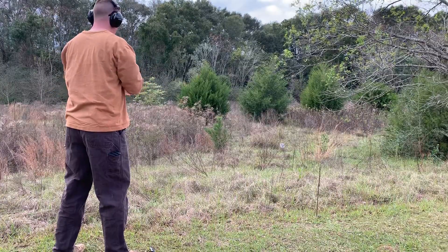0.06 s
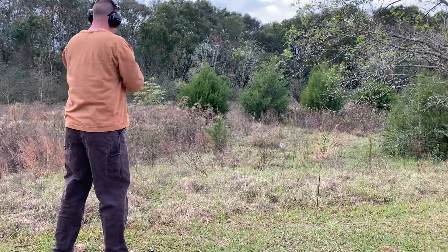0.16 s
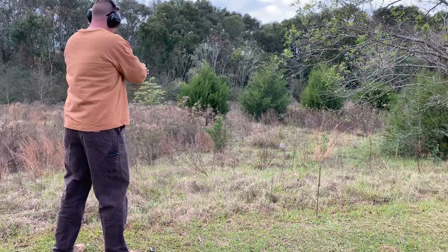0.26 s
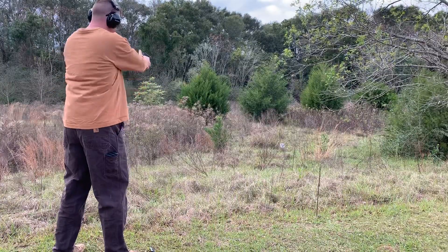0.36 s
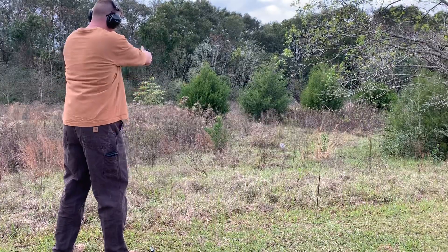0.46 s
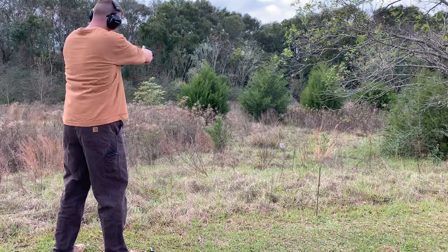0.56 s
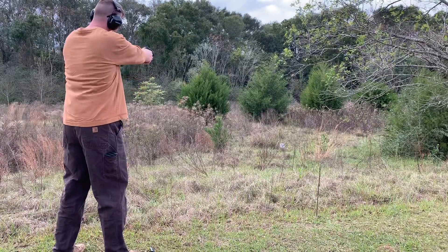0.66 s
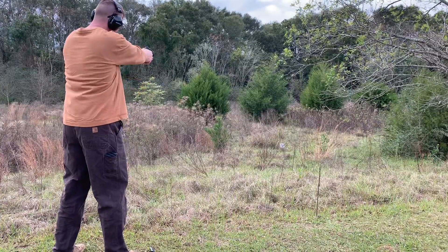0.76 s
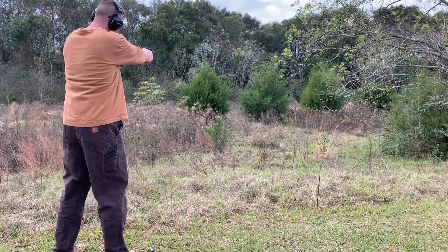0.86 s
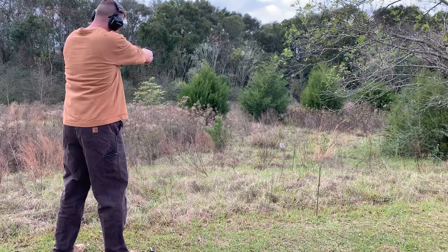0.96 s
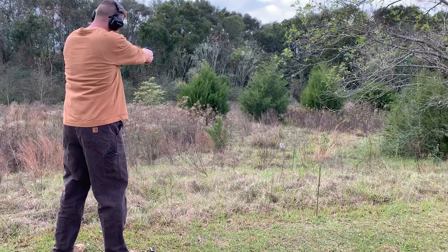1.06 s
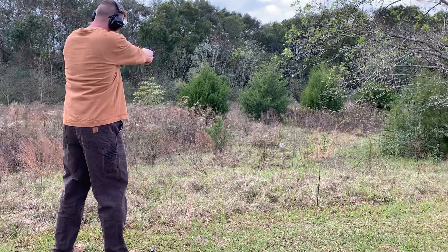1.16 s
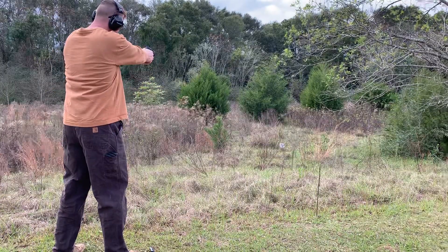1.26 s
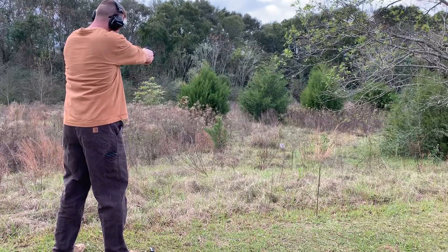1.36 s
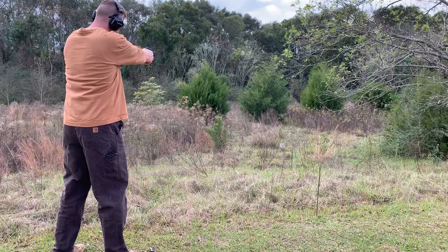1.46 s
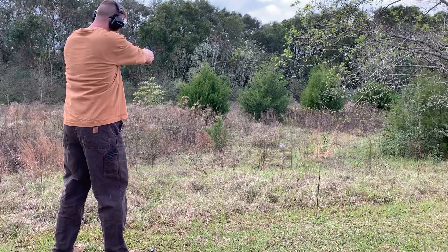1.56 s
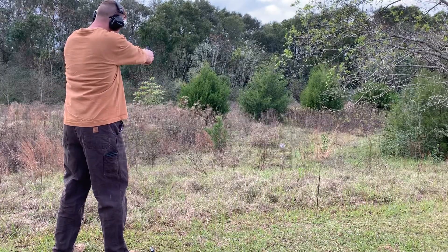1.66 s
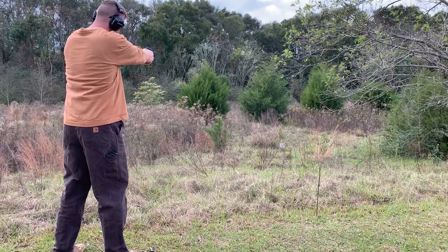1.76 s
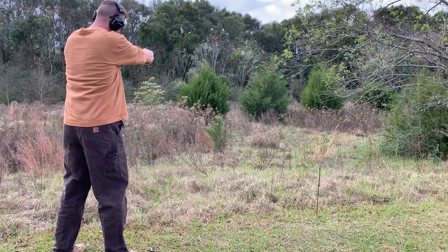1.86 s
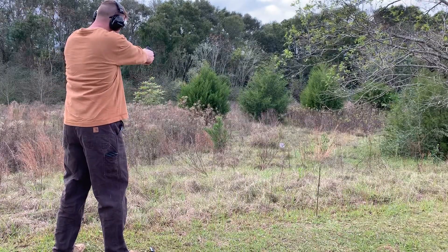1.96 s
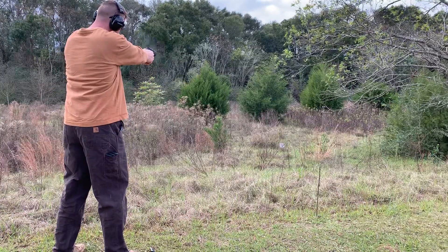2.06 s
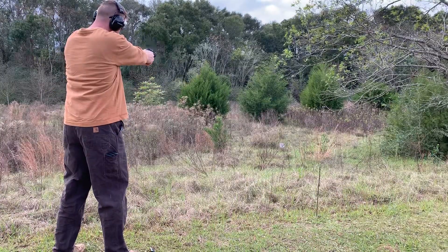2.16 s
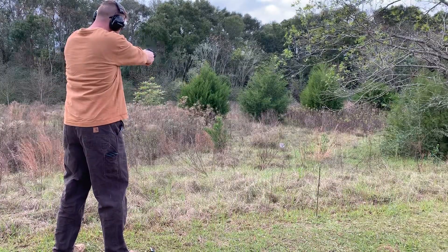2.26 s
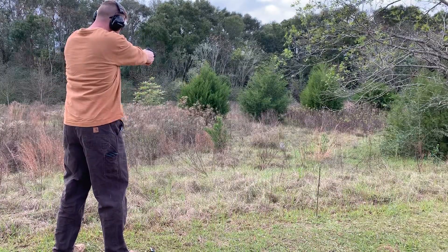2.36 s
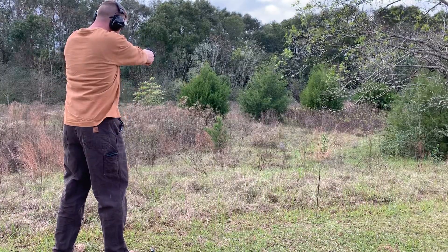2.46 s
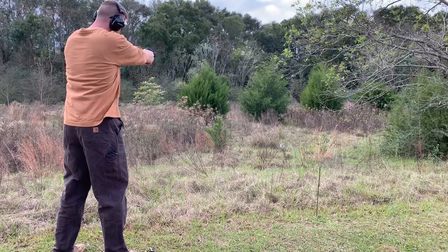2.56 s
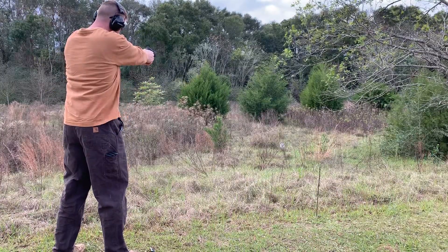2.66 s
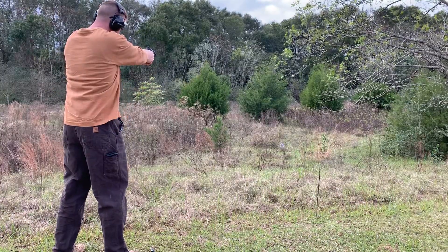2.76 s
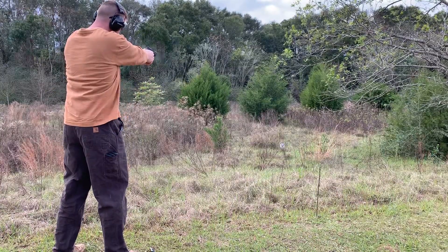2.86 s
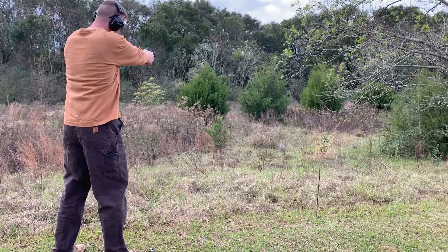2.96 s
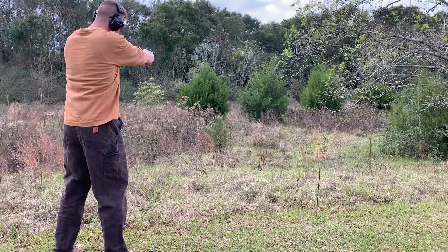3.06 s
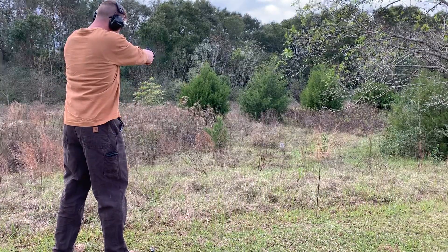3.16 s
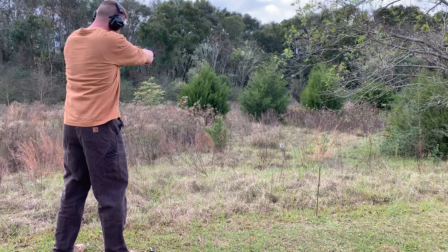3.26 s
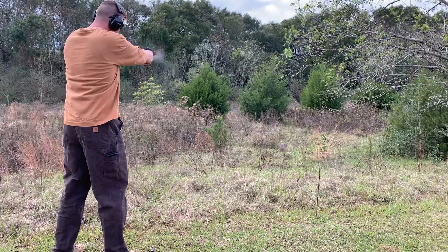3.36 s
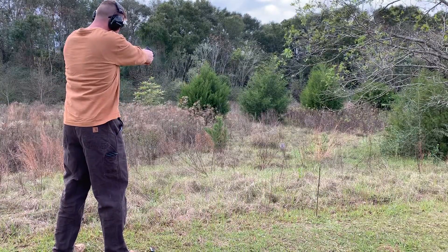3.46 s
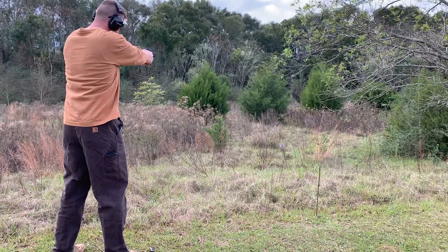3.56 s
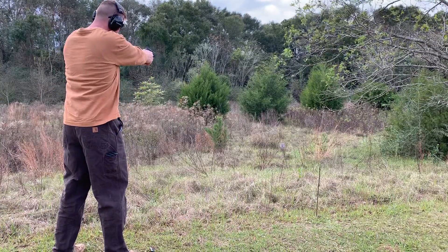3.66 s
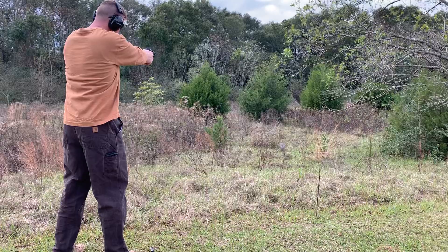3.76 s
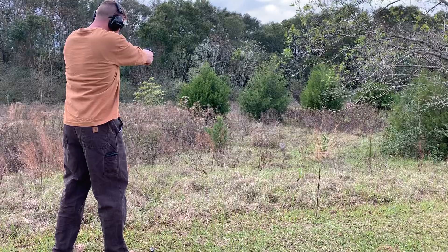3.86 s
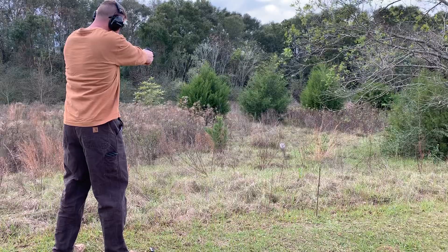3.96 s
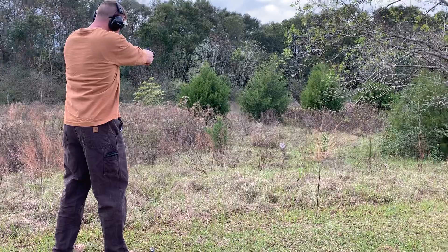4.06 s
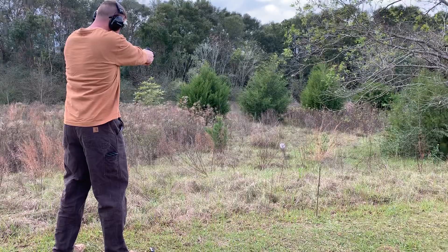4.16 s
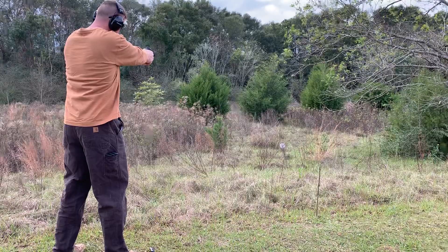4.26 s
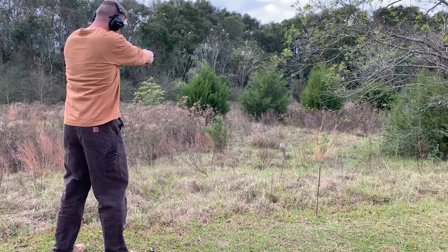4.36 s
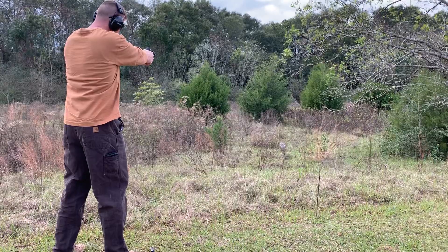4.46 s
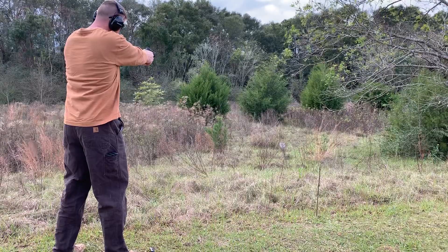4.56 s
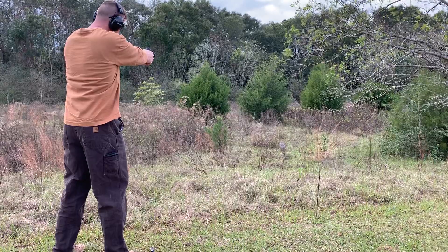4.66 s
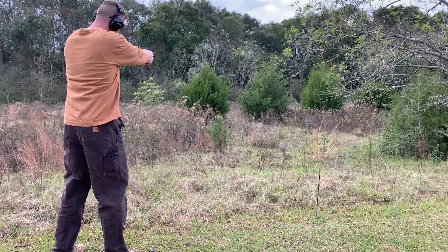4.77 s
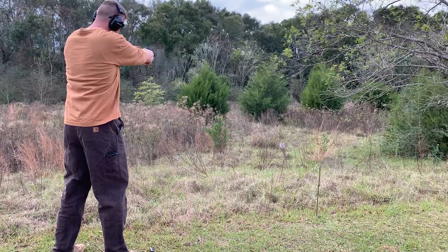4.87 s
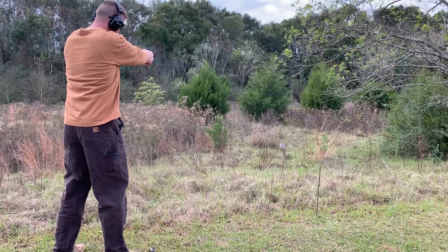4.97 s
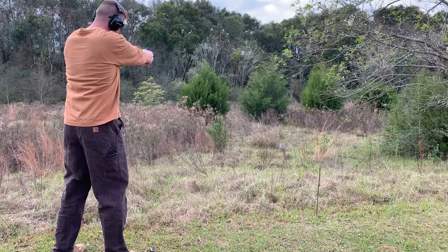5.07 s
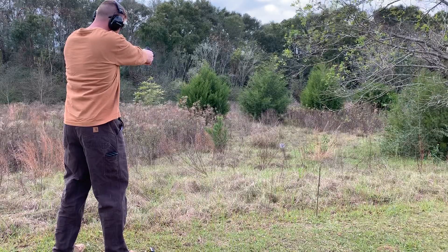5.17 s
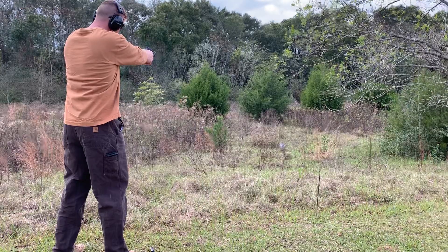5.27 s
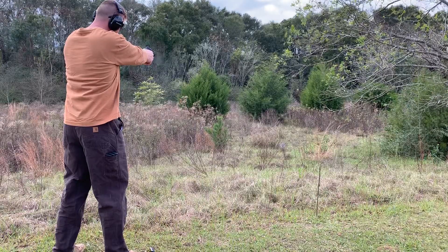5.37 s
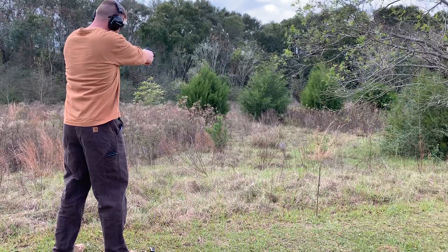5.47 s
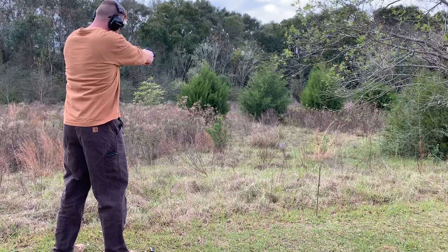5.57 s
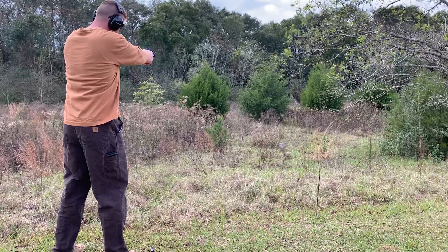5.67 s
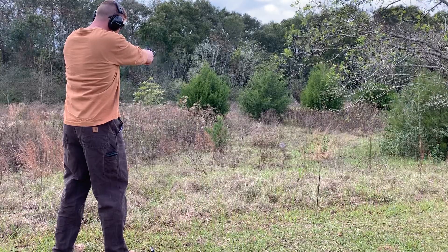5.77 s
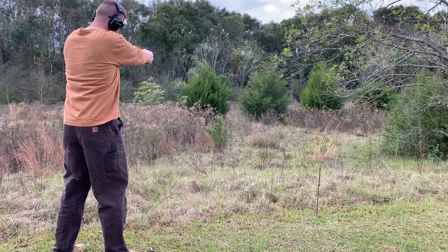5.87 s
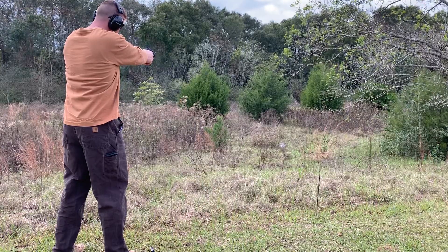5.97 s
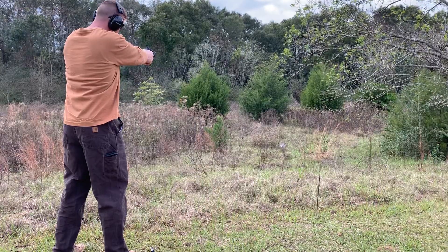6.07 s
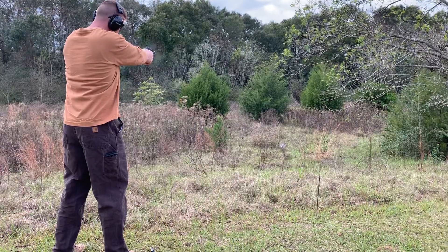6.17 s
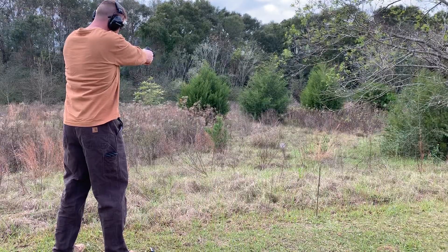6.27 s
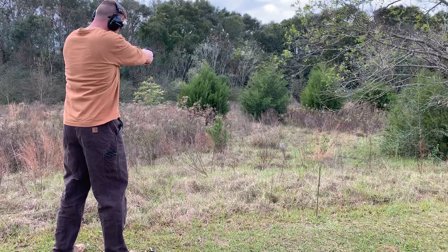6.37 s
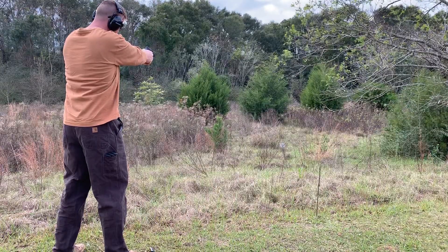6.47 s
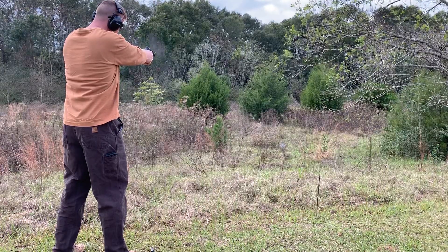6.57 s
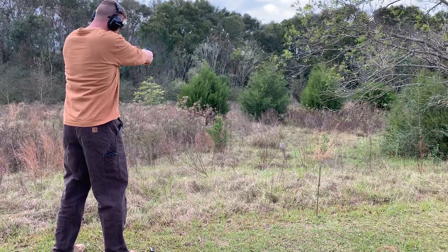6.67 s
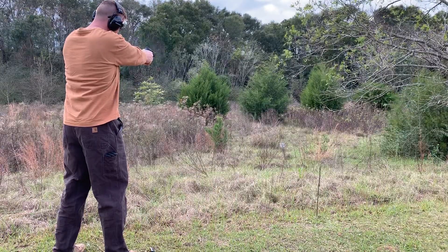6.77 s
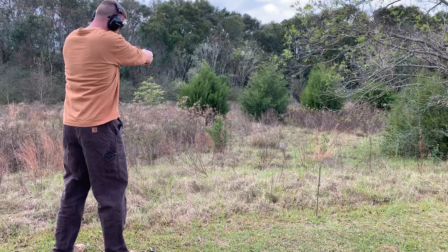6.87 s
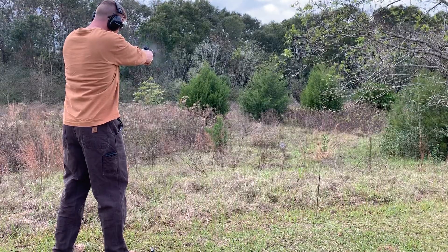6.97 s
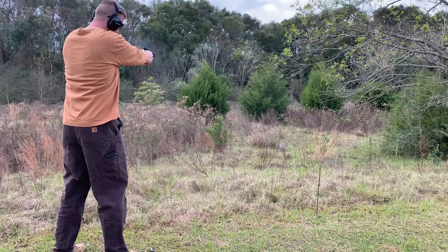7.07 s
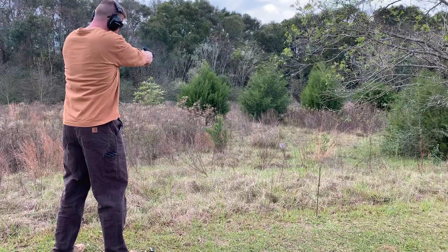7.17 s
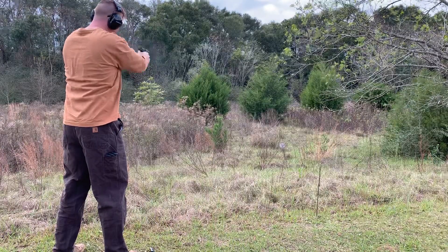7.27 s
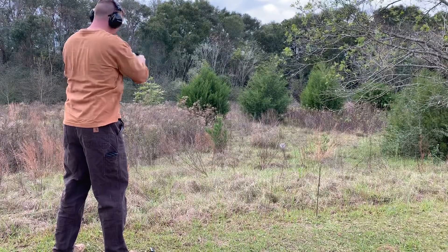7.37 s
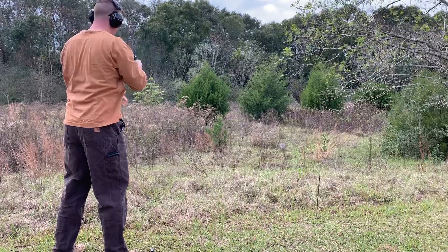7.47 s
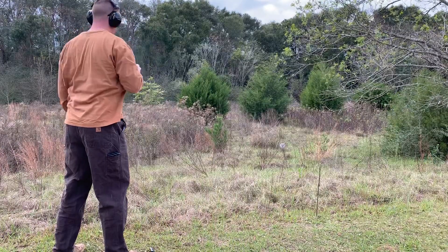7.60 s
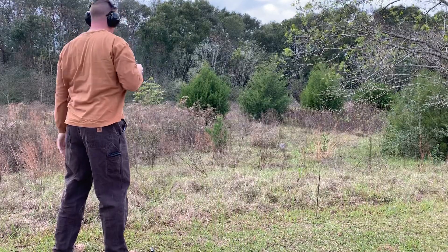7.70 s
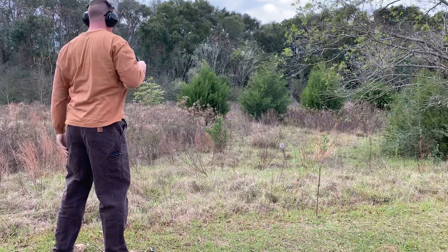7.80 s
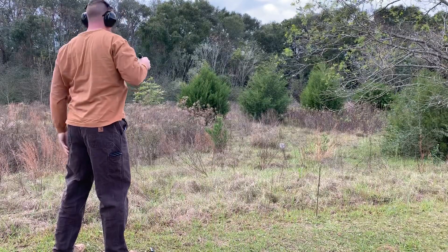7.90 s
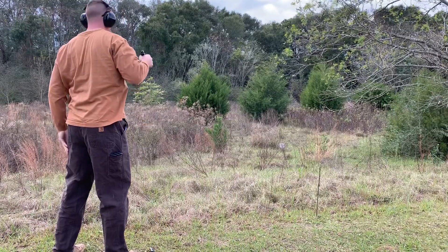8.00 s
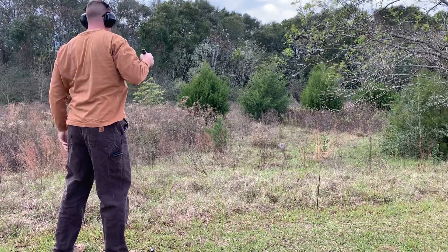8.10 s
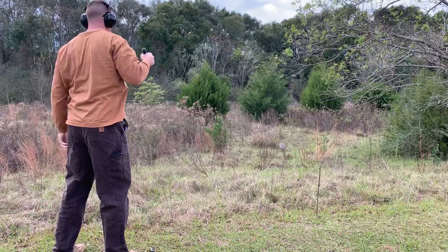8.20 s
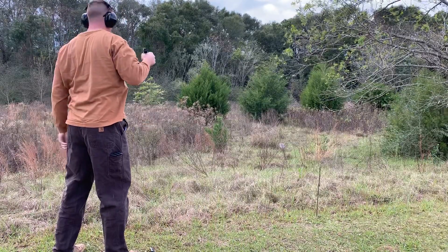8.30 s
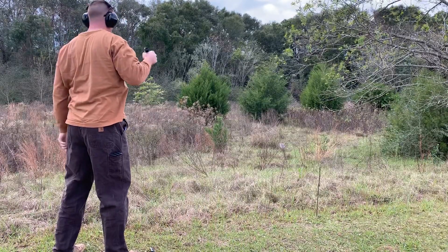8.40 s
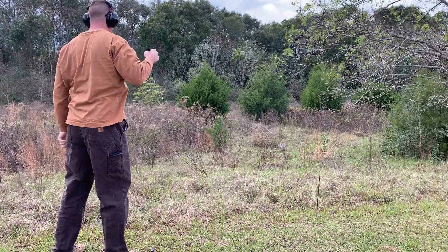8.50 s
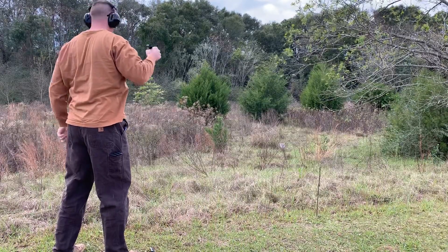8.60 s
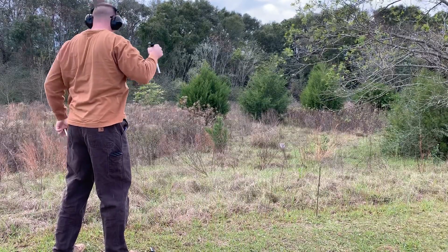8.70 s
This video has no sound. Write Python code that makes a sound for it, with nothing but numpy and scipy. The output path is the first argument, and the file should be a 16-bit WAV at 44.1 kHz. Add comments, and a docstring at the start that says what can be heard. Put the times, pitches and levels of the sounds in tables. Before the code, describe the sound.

For the first two seconds there is only light wind on a phone microphone in an open field: low rumble, flutter and soft pops over a faint hiss. At about 2 seconds a pistol fires a few metres away, a loud blast with a sharp crack. More shots come at 2.8, 3.4, 4.2 and 4.9 seconds, then five quicker ones, evenly spaced, from 5.3 to 6.9 seconds. A split second after each, a knock comes from downrange, and all but the second shot set a steel plate ringing with a short, high ping. Bushes and trees send every blast back in a wash lasting over a second. The wind gusts a little harder between about 2 and 5 seconds. At 7 seconds a faint deep hum swells briefly. The echoes fade, leaving soft wind until the end, near 8.7 seconds.

```python
"""Wind buffets a phone's microphone in a field: rumble, flutter, pops and a rare tick over a faint hiss.
From 2 s, ten pistol shots go off a few metres away, each a blast and a crack doubled off the ground.
Some 80 ms after each shot a knock comes from downrange; all but the second set a steel plate ringing.
Bushes and tree lines send the blast back for over a second. At 7 s a deep hum swells briefly
behind the last shot, and the wind carries on as the echoes fade."""
import sys
import numpy as np
from scipy import signal
from scipy.fft import rfft, irfft, next_fast_len
from scipy.io import wavfile
from scipy.ndimage import uniform_filter1d

SR = 44100
rng = np.random.default_rng(int(sys.argv[2]) if len(sys.argv) > 2 else 0)


def wav_out(sig):
    """Save sig, one row per channel (or a flat mono array), as 16-bit PCM at SR to the path in sys.argv[1]."""
    wavfile.write(sys.argv[1], SR, np.round(np.clip(np.atleast_2d(sig).T, -1, 1) * 32767).astype(np.int16))


N = 385434
SIZE = next_fast_len(N + SR)
HZ, TIME = np.maximum(np.arange(SIZE // 2 + 1) * SR / SIZE, 1), np.arange(N) / SR
SIDES = np.array([[.5], [-.5]])  # spreads a pan, left minus right in dB, over the two channels

# tone of the hiss and of the two wind layers: (frequency [Hz], relative level [dB])
HISS_EQ = [(180, -26.5), (300, -7.5), (701, -11.5), (978, -16.5), (2930, -19), (3290, -27), (9240, -31),
           (16000, -39.5)]
RUMBLE_EQ = [(15, -31), (40, -4), (65, 3.5), (110, -1.5), (200, -28), (500, -90)]
FLUTTER_EQ = [(60, -32.5), (120, -5.5), (200, -9.5), (330, -15.5), (700, -30.5), (1500, -58.5),
              (4000, -110)]
# fader moves of the wind: (time [s], rumble level [dB], flutter level [dB])
GUSTS = [(0, -67.5, -85), (.43, -72.5, -84), (.5, -56, -75), (.66, -58.5, -73.5), (.77, -53.5, -69),
         (.85, -76, -87), (.94, -66.5, -84), (1.02, -70, -86.5), (1.11, -54.5, -65), (1.601, -65, -67.5),
         (2.151, -59, -56.5), (2.26, -41.5, -45), (2.52, -51, -56), (2.741, -41.5, -45.5), (3.15, -37, -36),
         (3.5, -42.5, -48), (3.95, -41.5, -36), (4.119, -44, -45.5), (4.42, -37, -41.5),
         (4.72, -48.5, -45.5), (5.051, -52, -55), (5.5, -56, -63), (6.0, -53, -59.5), (6.3, -61.5, -63.5),
         (7.3, -60, -67), (7.9, -51.5, -59), (8.25, -64, -75.5), (8.47, -59.5, -67), (8.74, -75.5, -88)]
# single eddies hitting the capsules: (time [s], level [dB], pitch [Hz])
EDDY_POPS = [(.04, -60, 70), (.3, -64, 70), (0.596, -55.5, 200), (.74, -55, 90), (1.287, -50, 200),
             (1.355, -53.5, 200), (1.459, -59, 200), (1.518, -65.5, 200), (1.655, -59.5, 150),
             (1.824, -51, 69.6), (1.944, -65.5, 200), (2.171, -41, 90.3), (2.26, -32.5, 110),
             (2.73, -34, 80), (3.045, -30, 129.9), (3.193, -24.5, 80), (3.583, -27.5, 200),
             (3.909, -25.5, 200), (4.123, -35.5, 200), (4.36, -33, 129.8), (4.455, -29.5, 70),
             (4.511, -33.5, 200), (5.129, -34, 69.9), (5.635, -44.5, 200), (5.69, -41.5, 80),
             (5.951, -45.5, 69.96), (6.37, -48, 110.2), (6.454, -40.5, 69.5), (6.66, -46.5, 68.5),
             (6.735, -44, 79.5), (6.773, -44.5, 80), (6.83, -46.5, 80.4), (7.413, -35, 200),
             (7.593, -50.5, 200), (7.681, -33, 200), (7.875, -42, 70.9), (7.949, -42.5, 89.7),
             (8.08, -54, 80)]
# faint ticks: (time [s], level [dB])
TICK_CUES = [(1.521, -80), (8.451, -68)]
# pistol shots: (time [s], blast gain [dB], crack gain [dB], low cut of the phone's wind filter [Hz])
SHOT_CUES = [(2.0205, -1, -6.5, 260), (2.8309, 1.5, -9, 224.5), (3.3878, -1, -9.5, 207),
             (4.201, -1, -6, 212), (4.8537, -0.5, -8.5, 200), (5.31, 0.5, -6, 126.6),
             (5.7279, 0, -5, 111.2), (6.144, -1.5, -5.5, 36), (6.529, -1, -8.5, 63.15),
             (6.926, -1.5, -6, 35.9)]
# tone of the muzzle blast: (frequency [Hz], relative level [dB])
BLAST_EQ = [(40, 1), (170, 8.5), (400, -2.5), (900, -2), (1700, -7), (2400, -17), (4000, -31.5),
            (6500, -16.5), (17000, -40.5)]
# microphone port resonances: (frequency [Hz], width [Hz], gain [dB])
PORT_RINGS = [(9880, 2300, 8), (14000, 1700, -54), (4115, 1100, -33)]
# slaps off single reflectors: (delay [s], gain [dB], pan [dB], low cut [Hz], high cut [Hz])
SLAPS = [(0.124, -36, 1, 399.8, 1800), (.138, -33, -3, 401.5, 1330), (.163, -36.5, -3, 407, 3500),
         (.172, -23.5, -14.5, 1690, 3660), (0.185, -24, -1, 1740, 3500), (0.198, -35, -10.5, 414.7, 2560),
         (.21, -23, -1.5, 1800, 3800), (.225, -26, 1, 1876, 3600), (.246, -30, -2, 2050, 3600),
         (.33, -31.5, 4, 404, 1310), (.345, -32, 1.3, 410.6, 1500)]
# belts of bushes and trees: (delay of the peak [s], level [dB], rise [dB/s], fall [dB/s], pan [dB],
# tilt about 1 kHz [dB/octave], twig lift [dB])
TREE_BELTS = [(.03, -56.5, 60, 44.5, -0.5, 7, -0.6), (.168, -50, 1200, 119.5, -2.5, 1, 6.5),
              (.215, -50, 300.5, 170, 0.1, -0.3, 4), (0.328, -43, 1501.5, 200, 0, -3.5, -1.2),
              (.36, -44.5, 296, 301, 1, -1, -0.9), (.46, -44, 87.5, 27, 0.1, 0.12, 0.7),
              (1.0, -64, 28, 7.5, 2.2, 4.5, .1)]
# tone of the foliage: (frequency [Hz], third-octave gain [dB])
LEAF_EQ = [(150, -25.5), (300, -23), (600, -6), (1200, -8.5), (2500, -10), (4500, -10), (7000, -7),
           (9500, 7.5), (11500, -13), (16000, -52.5)]
# scatter off the nearby grass and the shooter: (frequency [Hz], third-octave level [dB], t60 [s])
NEAR_SCATTER = [(200, -28, 0.044), (599, -19.5, 0.042), (1430, -35.5, 0.078), (3500, -31, 0.058),
                (6140, -42.5, 0.13), (9100, -27.5, 0.14), (11930, -28, 0.08), (14000, -36, 0.22)]
# bullets landing downrange, the second a miss: (time [s], clack gain [dB], thud gain [dB],
# ring gain [dB], spot across the plate [0-1], spot up the plate [0-1])
BULLET_CUES = [(2.101, -35, -23, 6.5, .115, 0.45), (2.9083, -34, -22, -27, 0.4, .3),
               (3.462, -21, -21.5, 7, .265, .235), (4.2739, -22.5, -19, 4.5, .37, 0.35),
               (4.9262, -20.5, -19, -4.5, .325, .055), (5.3861, -28, -22, 5.5, .385, 0.26),
               (5.8028, -24.5, -21, -0.5, .31, 0.3), (6.2193, -19, -20.5, 2.1, .265, .46),
               (6.6047, -34, -22.5, 2, .355, .1), (7.003, -27.5, -23.5, 1.9, .1, 0.4)]
# steel plate modes: (frequency [Hz], t60 [s], pan [dB], level if struck on a crest [dB],
# half waves across [count], half waves up [count])
PLATE_MODES = [(2078, .18, -3, -30, 0, 2), (2900, .21, -4, -41.5, 4, 1), (4578, .22, -7, -39.5, 6, 0),
               (4915, .26, -9, -47, 3, 1), (7891, .44, 0, -31, 6, 1), (8500, .31, 0, -27.5, 1, 3),
               (10075, .25, 0, -36, 3, 3), (11070, .23, 0, -34.5, 5, 1), (12610, .27, 0, -30.5, 1, 7),
               (13290, .28, 0, -42, 1, 6), (13440, .34, 0, -43, 3, 6), (15045, .26, 0, -43, 5, 4)]


def undb(db):
    return 10 ** (np.asarray(db) / 20)


def curve(table, hz, col=1):
    """Reads a table on a log-frequency axis."""
    return np.interp(np.log(hz), np.log(np.array(table)[:, 0]), np.array(table)[:, col])


def unit(x):
    return x / np.sqrt(np.mean(x ** 2))


def shaped(x, eq):
    """Runs x through an EQ curve and brings it to unit RMS."""
    return unit(irfft(rfft(x, SIZE) * undb(curve(eq, HZ)), SIZE)[..., :N])


def delay(s, hz=HZ):
    return np.exp(-2j * np.pi * hz * s)


def add(out, x, s):
    i = int(round(s * SR))
    out[:, i:i + x.shape[-1]] += x[..., :N - i]


def wander(rate_hz):
    """Glides from one random value to the next; spread near 1."""
    hold = int(SR / rate_hz)
    return 1.2 * uniform_filter1d(np.repeat(rng.standard_normal(N // hold + 1), hold), hold)[:N]


def hiss(level_db=-84):
    """A steady bed of distant leaves and the microphone's own noise."""
    return shaped(rng.standard_normal((2, N)), HISS_EQ) * undb(level_db)


def wind():
    """Eddies thump the capsules: low noise in short uneven puffs, nearly alike on both sides."""
    s, rumble_db, flutter_db = np.transpose(GUSTS)
    noise = rng.standard_normal((2, N))
    eddy_db = 3.5 * wander(24)  # one eddy strikes both layers
    rumble = shaped(noise[0] * undb(eddy_db + 2 * wander(13)), RUMBLE_EQ)
    flutter = shaped(noise[1] * undb(eddy_db + 5 * wander(50)), FLUTTER_EQ)
    mid = rumble * undb(np.interp(TIME, s, rumble_db)) + flutter * undb(np.interp(TIME, s, flutter_db))
    side = np.roll(mid, SR // 2) * undb(-10)
    return np.array([mid + side, mid - side])


def pops():
    """A single eddy lands as a lopsided pressure bump, about one cycle long."""
    out, t = np.zeros((2, N)), np.arange(SR // 10) / SR
    for s, db, hz in EDDY_POPS:
        add(out, undb(db) * 9 * hz * t * np.sin(2 * np.pi * hz * t) * np.exp(-3.5 * hz * t), s)
    return out


def ticks(t60=.012):
    """Tiny, dry bursts of noise in the centre."""
    out, t = np.zeros((2, N)), np.arange(SR // 100) / SR
    for s, db in TICK_CUES:
        add(out, undb(db - 60 * t / t60) * rng.standard_normal(len(t)), s)
    return out


def port_ring(hz):
    """Response of the cavities in front of the capsules, which ring on a sharp attack."""
    return sum(undb(db) / (1 + 1j * (hz - pitch ** 2 / hz) / width) for pitch, width, db in PORT_RINGS)


def shots(ground_s=.003094, lead_in_s=.05):
    """Muzzle blast and bright crack, direct and off the ground; the blast slaps back off reflectors."""
    out, size = np.zeros((2, N)), 1 << 15
    hz = np.maximum(np.arange(size // 2 + 1) * SR / size, 1)
    body = undb(24.5 + curve(BLAST_EQ, hz)) * delay(np.array([[0], [.00007]]), hz)  # left side first
    bounce = delay(ground_s, hz)
    blast = body * (1 + undb(-2.8 * SIDES) * bounce / (1 + (200 / hz) ** 4))  # soft soil swallows bass
    slap_spread_db = 4.8 * rng.standard_normal((len(SHOT_CUES), len(SLAPS)))
    for (s, blast_db, crack_db, cut_hz), trims_db in zip(SHOT_CUES, slap_spread_db):
        gas_jet = rng.standard_normal((2, 400)) * undb(-13 - 60 * np.arange(400) / SR / .008)
        crack = 3 * port_ring(hz) * (1 + rfft(gas_jet, size)) * (1 + undb(-6.5) * bounce)
        slaps = sum(undb(db + trim + pan * SIDES) * delay(lag, hz)
                    / (1 + (hz / top) ** 4) / (1 + (bottom / hz) ** 4)
                    for (lag, db, pan, bottom, top), trim in zip(SLAPS, trims_db))
        shot = undb(blast_db) * blast * (1 + slaps) + undb(crack_db) * crack
        low_cut = signal.freqs(*signal.butter(4, cut_hz, "high", analog=True), hz)[1]
        add(out, irfft(shot * low_cut * abs(low_cut) * delay(lead_in_s, hz), size), s - lead_in_s)
    return out


def foliage_tail(twig_hz=2500, air_db_per_s=48):
    """Grass and trees scatter each blast into a grainy wash; air eats the treble of late returns."""
    peak_s, db, rise, fall, pan, tilt, lift = np.transpose(TREE_BELTS)[..., None, None]
    lag = np.arange(1900) / 1000  # envelopes run in 1 ms steps
    belt_db = db - np.maximum(rise * (peak_s - lag), fall * (lag - peak_s)) + SIDES * pan
    grain = rfft(rng.standard_normal((2, N)) * undb(1.4 * wander(200)), SIZE)  # trunks and branches
    # the trees stand in clumps, the same for every shot and shared by neighbouring bands
    clumps = np.repeat(rng.standard_normal((21, 2, len(lag) // 12 + 1)), 12, axis=2)
    clumps = uniform_filter1d(clumps, size=12)
    clumps = unit(uniform_filter1d(clumps, size=4, axis=0))[..., :len(lag)]
    out = np.zeros((2, N))
    for hz, clump in zip(160 * 2 ** (np.arange(21) / 3), clumps):  # third-octave bands
        tone_db = tilt * np.log2(min(hz, 3000) / 1000) + lift * np.exp(-2 * np.log2(hz / twig_hz) ** 2)
        trees_db = 10 * np.log10(np.sum(undb(belt_db + tone_db) ** 2, axis=0))
        air_loss_db = air_db_per_s * (hz / 6000) ** .93 * lag
        far_db = trees_db + 1.5 * clump + curve(LEAF_EQ, hz) - air_loss_db
        near_db = curve(NEAR_SCATTER, hz) - 60 * lag / curve(NEAR_SCATTER, hz, col=2)
        tail_power = undb(far_db) ** 2 + undb(near_db) ** 2
        power = np.zeros((2, N // 44 + 2))
        for s, *_ in SHOT_CUES:
            ms = int(s * 1000)
            power[:, ms:ms + len(lag)] += tail_power[:, :power.shape[1] - ms]
        band = irfft(grain * np.cos(np.pi / 2 * np.clip(3 * np.log2(HZ / hz), -1, 1)), SIZE)[:, :N]
        out += unit(band) * [np.interp(TIME * 1000, np.arange(len(p)), np.sqrt(p)) for p in power]
    return out


def bullet_impacts(ring_rise_s=.0034, ground_s=.0036):
    """Bullets land with a clack and a thud; on the steel plate, the spot struck picks the modes that ring."""
    out, t = np.zeros((2, N)), np.arange(SR * 4 // 5) / SR
    hz, t60, pan, mode_db, across, up = np.transpose(PLATE_MODES)[..., None]
    thud = signal.sosfilt(signal.butter(2, [350, 1800], "band", fs=SR, output="sos"), t == 0)
    thud = thud / thud.max() * undb(-5 * SIDES)
    dirt_band = signal.butter(2, [400, 2500], "band", fs=SR, output="sos")
    click_hz = np.maximum(np.arange(len(t) // 2 + 1) * SR / len(t), 1)
    click = irfft(port_ring(click_hz), len(t)) * (t < .02)
    phases = rng.random((len(BULLET_CUES), 2, len(PLATE_MODES), 1))
    for (s, clack_db, thud_db, ring_db, x, y), phase in zip(BULLET_CUES, phases):
        drive = np.abs(np.cos(np.pi * across * x) * np.cos(np.pi * up * y)) + .03  # faint on a node
        envelope = undb(ring_db + mode_db - 60 * t / t60) * (1 - np.exp(-t / ring_rise_s))
        beating = 1 + .35 * np.sin(2 * np.pi * (.002 * hz * t + phase[1]))  # close twin modes
        modes = drive * envelope * beating * np.sin(2 * np.pi * (hz * t + phase[0]))
        lead_splash = rng.standard_normal((2, len(t))) * undb(-8.5 - 60 * t / .07)
        dirt_bank = signal.sosfilt(dirt_band, rng.standard_normal((2, len(t)))) * undb(-60 * t / .046)
        knock = undb(clack_db) * (click / click.max() + lead_splash) + undb(thud_db) * (thud + dirt_bank)
        add(out, knock + undb(pan.T * SIDES) @ modes, s)
        add(out, undb(-3) * knock, s + ground_s)  # the knock bounces off the ground
    return out


def deep_hum(start_s=7.03, level_db=-44, pitch_hz=44, swell_s=.075):
    """A soft, wavering sub tone that rises and dies away."""
    age = np.maximum(TIME - start_s, 0) / swell_s
    envelope = undb(level_db) * np.e * age * np.exp(-age ** 1.2)
    return envelope * np.sin(2 * np.pi * pitch_hz * TIME + .6 * wander(6.3))


def scene():
    """Gunfire, its tail and the impacts up front; wind and small noises underneath."""
    return shots() + foliage_tail() + bullet_impacts() + wind() + pops() + ticks() + deep_hum() + hiss()


def record(dry, ceiling=1.1, top_hz=16600):
    """The phone smears the lows, narrows bass and treble, rounds the peaks and cuts the top."""
    lag_cycles = 1.05 * np.log((np.minimum(HZ, 9000) + 50) / 9000) - .26  # lows lag by about a period
    left, right = rfft(dry, SIZE) * np.exp(-2j * np.pi * lag_cycles)
    right = right * undb(3.7 * np.exp(-(np.log(HZ / 4200) / .32) ** 2))  # the right port adds presence
    left, right = np.array([left, right]) / (1 + (HZ / 15500) ** 8)  # capsule roll-off
    mono_treble, mono_bass = np.clip((HZ - 6800) / 900, 0, .85), np.clip(1 - HZ / 900, 0, .6)
    mid, width = (left + right) / 2, 1 - mono_treble - mono_bass
    left = width * left + (mono_bass + mono_treble * delay(.0002173)) * mid  # shared treble comes late
    right = width * right + (mono_bass + mono_treble) * mid
    rounded = np.tanh(irfft(np.array([left, right]), SIZE)[:, :N] / ceiling) * ceiling
    return signal.sosfilt(signal.ellip(10, .2, 80, top_hz, fs=SR, output="sos"), rounded)


dry = scene()
out = record(dry)
wav_out(out)
```